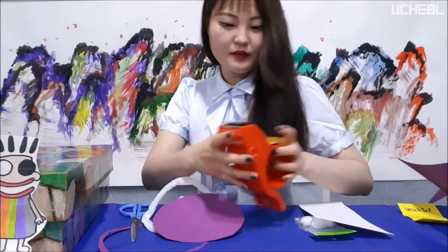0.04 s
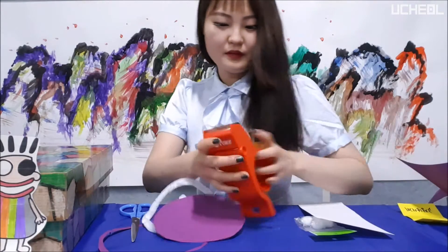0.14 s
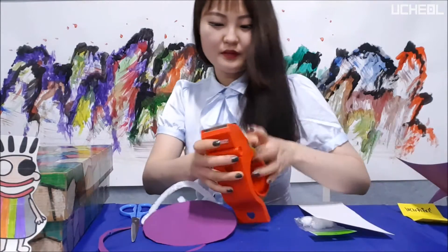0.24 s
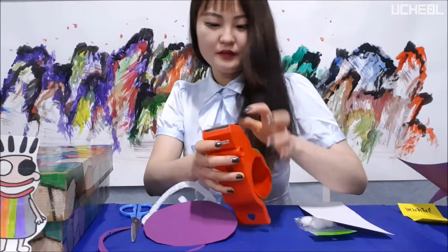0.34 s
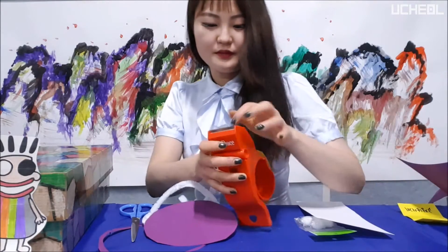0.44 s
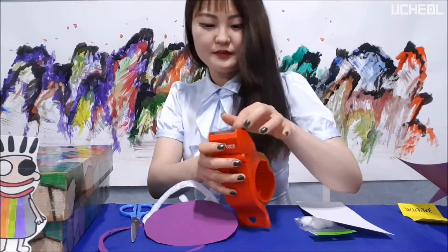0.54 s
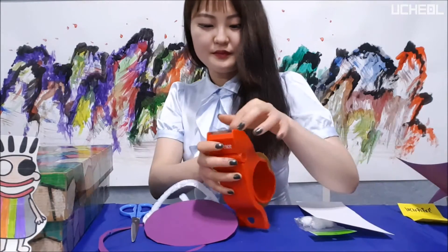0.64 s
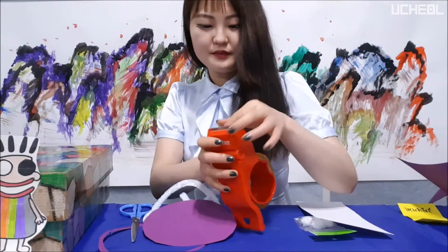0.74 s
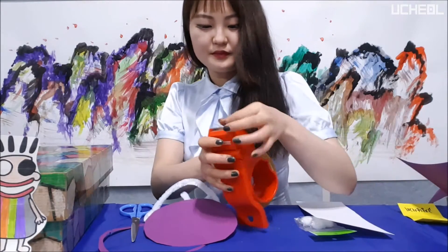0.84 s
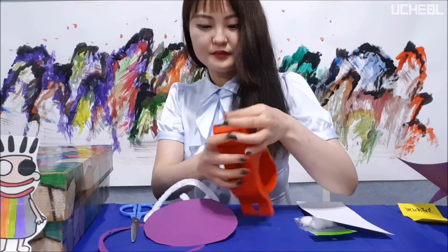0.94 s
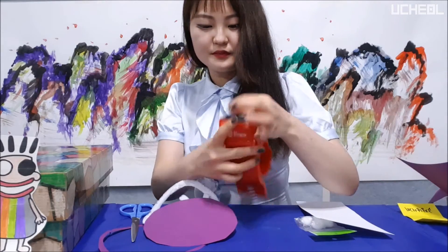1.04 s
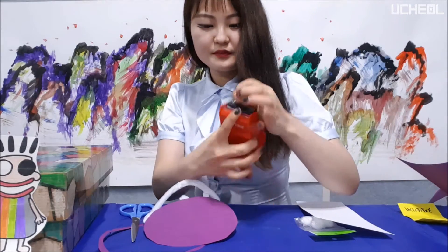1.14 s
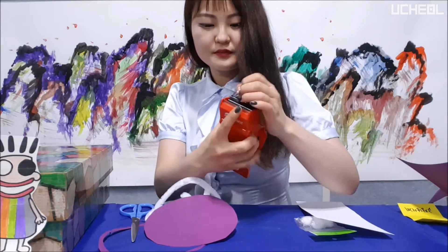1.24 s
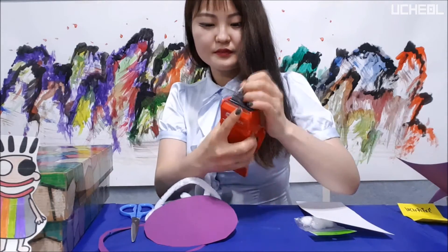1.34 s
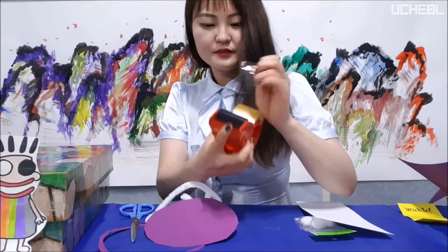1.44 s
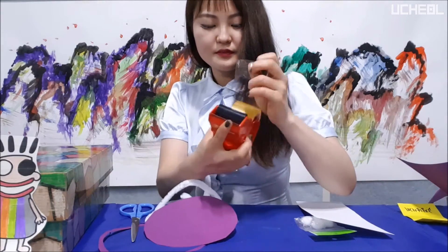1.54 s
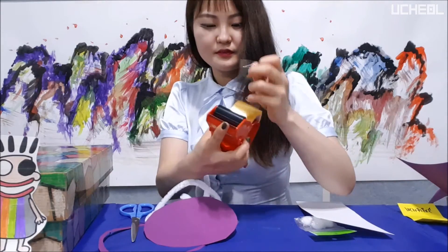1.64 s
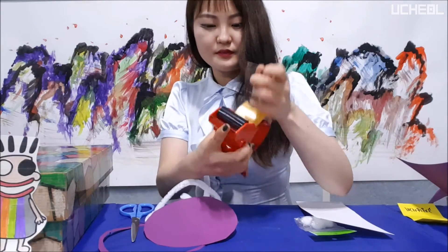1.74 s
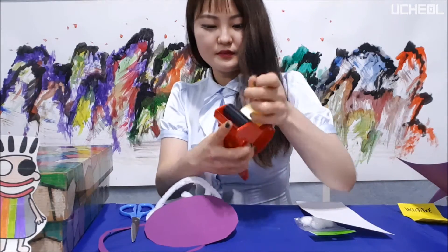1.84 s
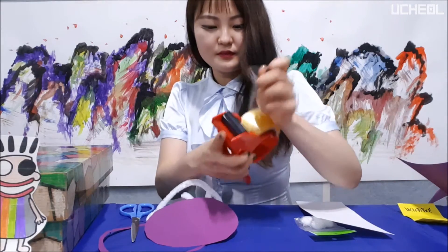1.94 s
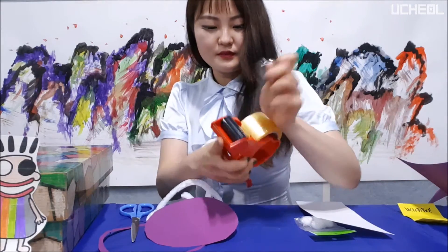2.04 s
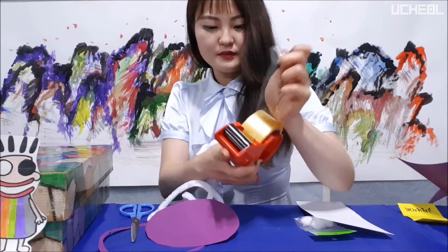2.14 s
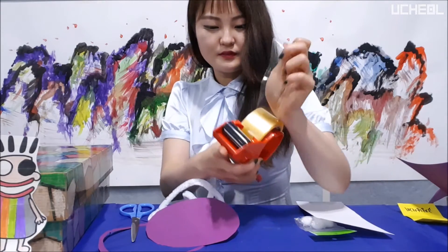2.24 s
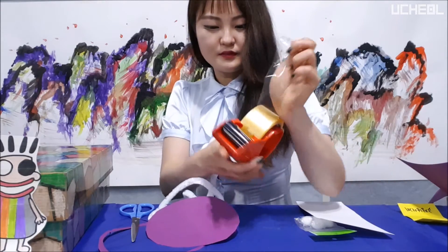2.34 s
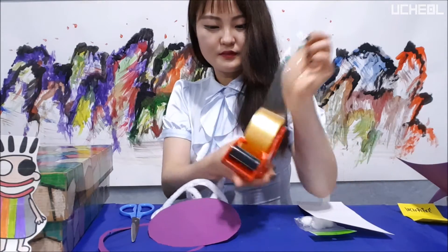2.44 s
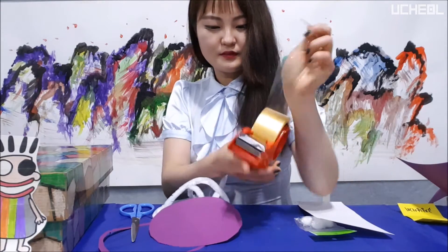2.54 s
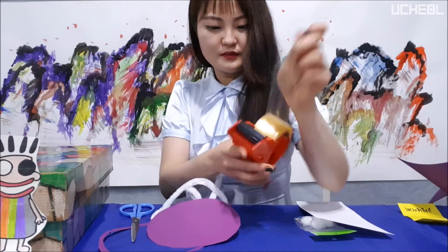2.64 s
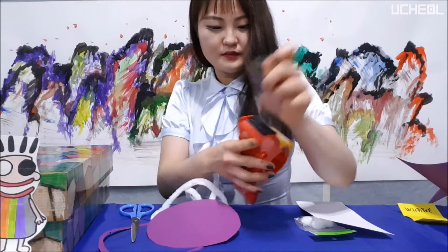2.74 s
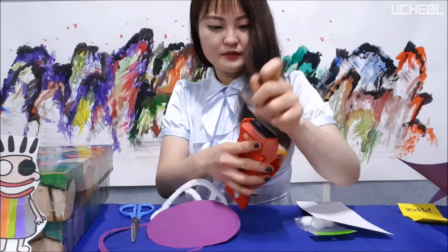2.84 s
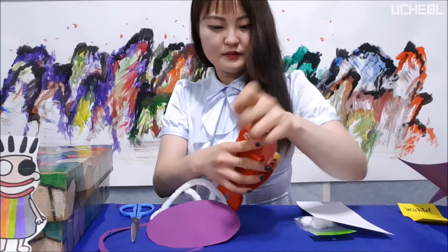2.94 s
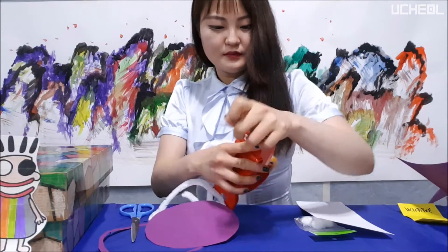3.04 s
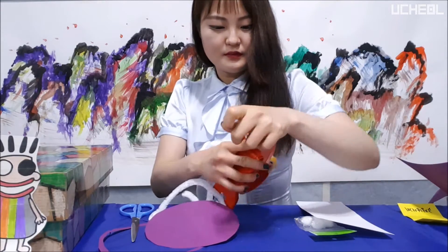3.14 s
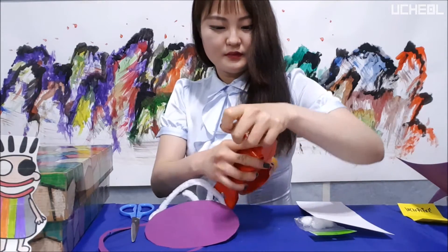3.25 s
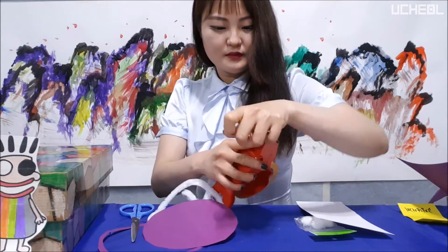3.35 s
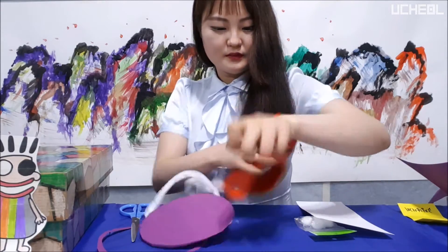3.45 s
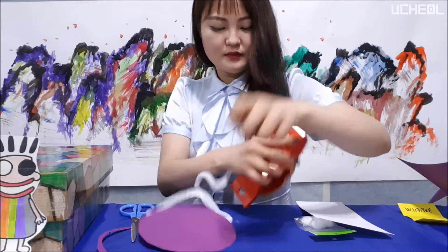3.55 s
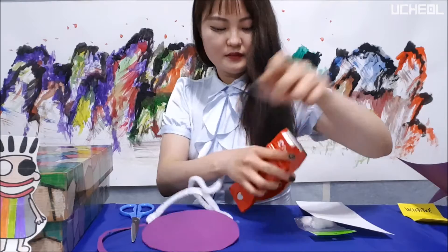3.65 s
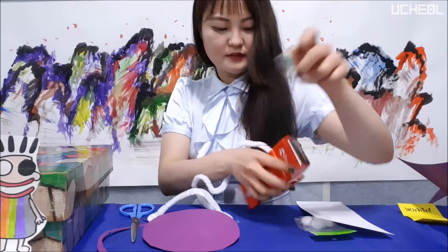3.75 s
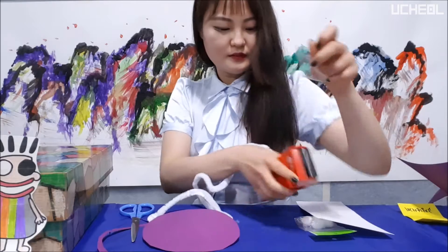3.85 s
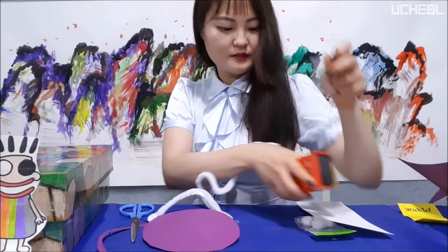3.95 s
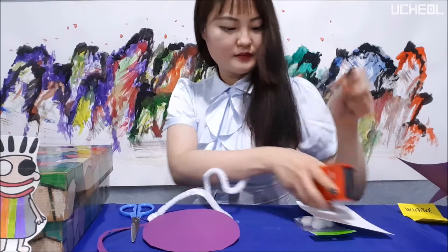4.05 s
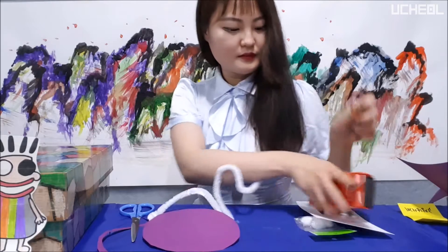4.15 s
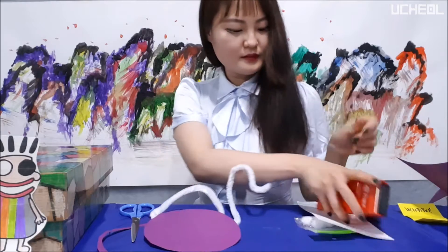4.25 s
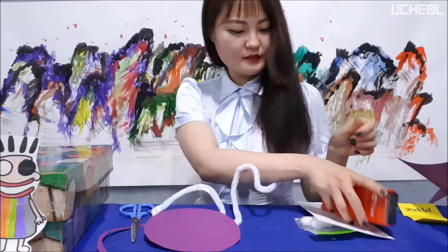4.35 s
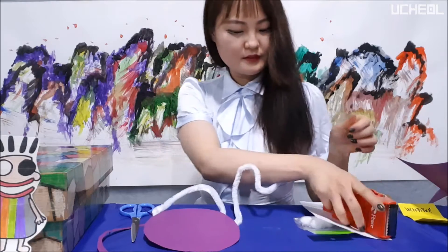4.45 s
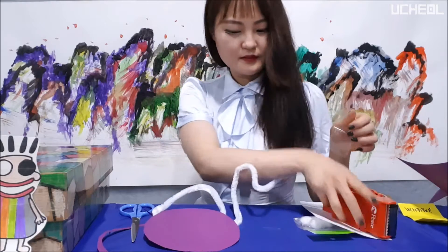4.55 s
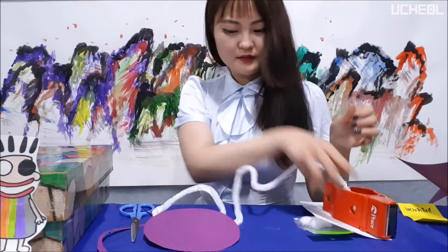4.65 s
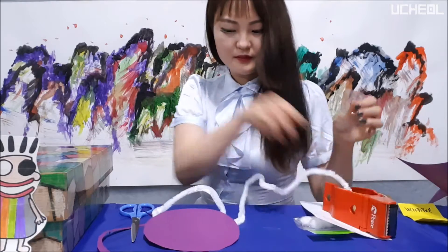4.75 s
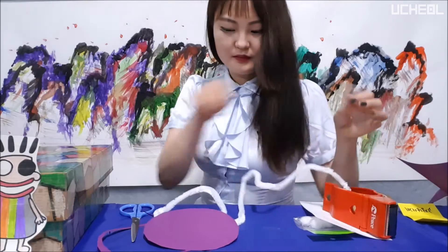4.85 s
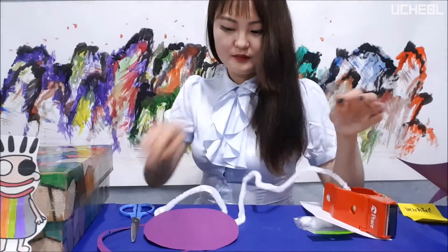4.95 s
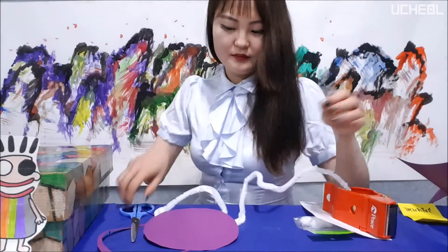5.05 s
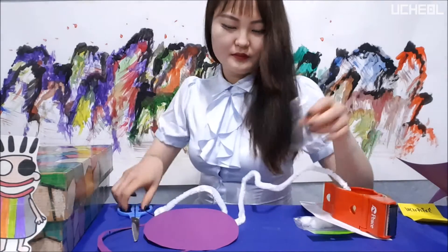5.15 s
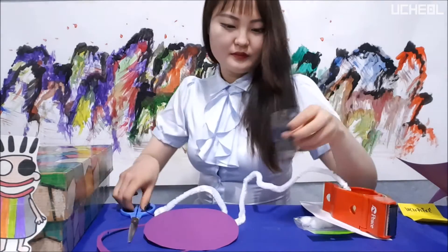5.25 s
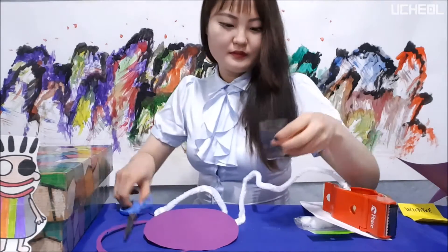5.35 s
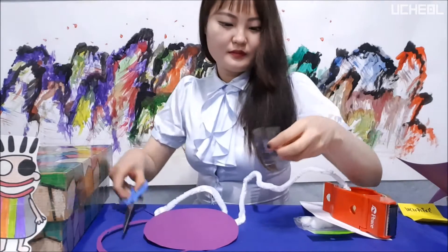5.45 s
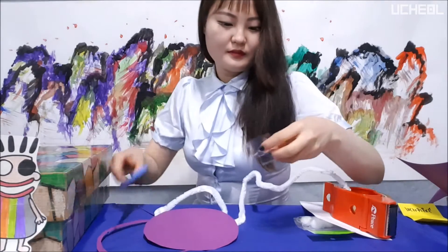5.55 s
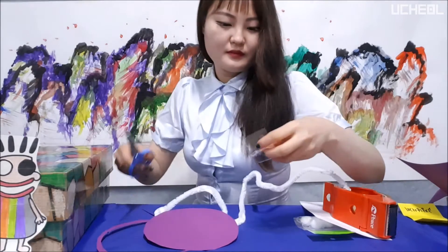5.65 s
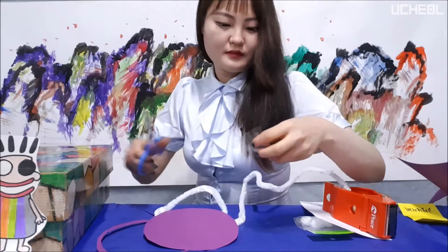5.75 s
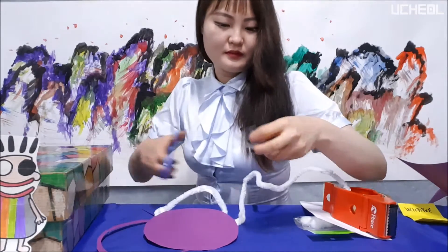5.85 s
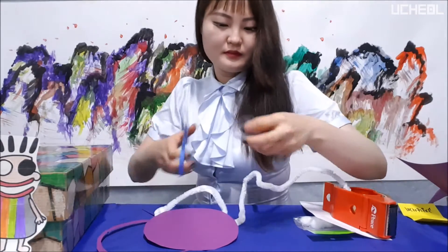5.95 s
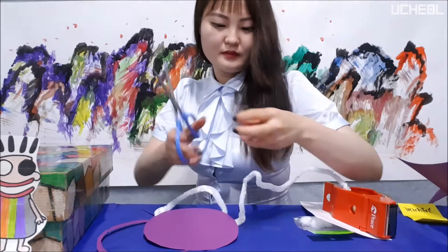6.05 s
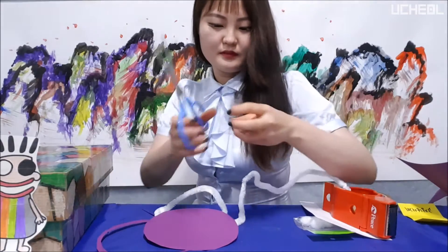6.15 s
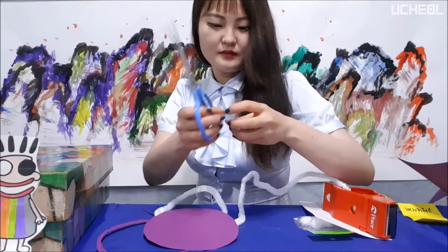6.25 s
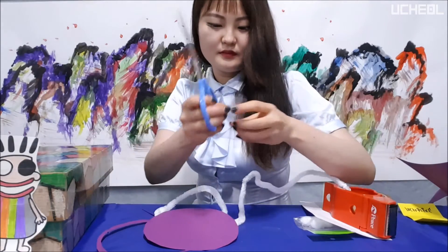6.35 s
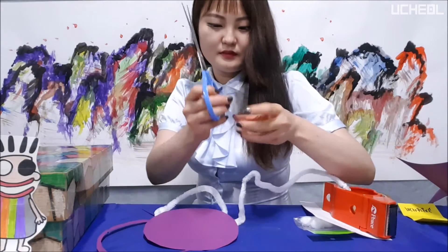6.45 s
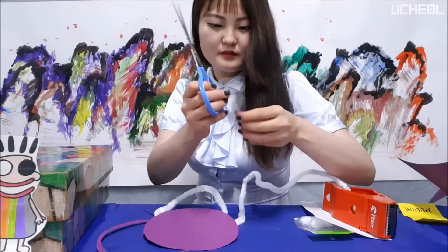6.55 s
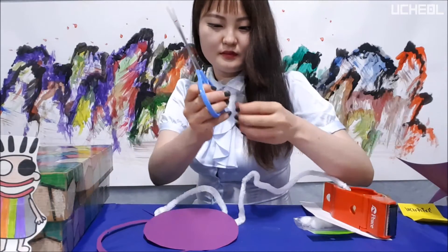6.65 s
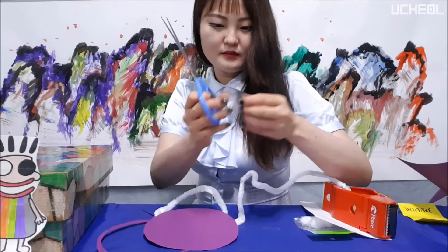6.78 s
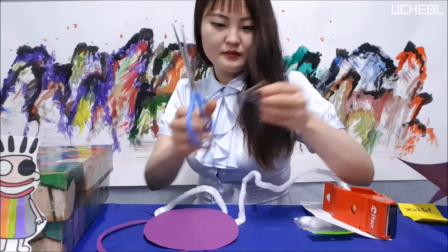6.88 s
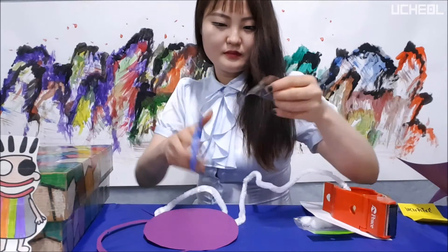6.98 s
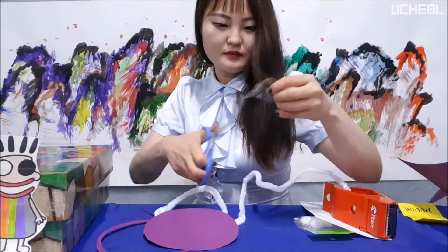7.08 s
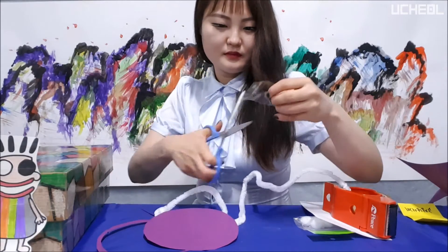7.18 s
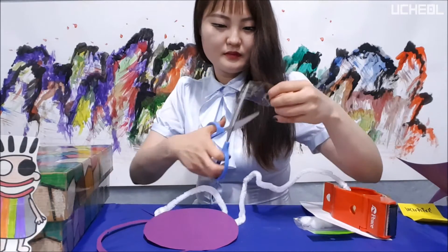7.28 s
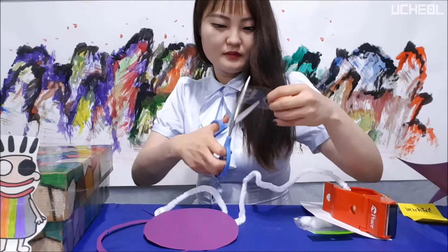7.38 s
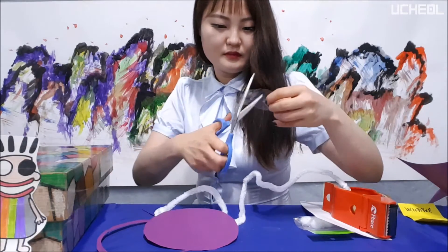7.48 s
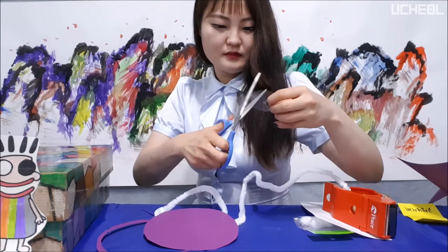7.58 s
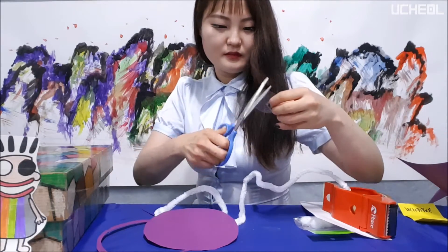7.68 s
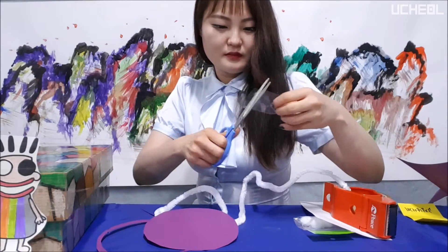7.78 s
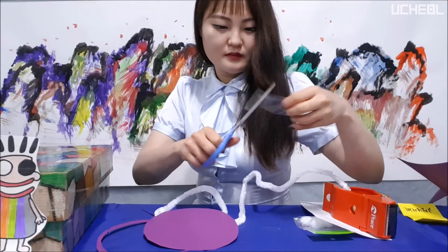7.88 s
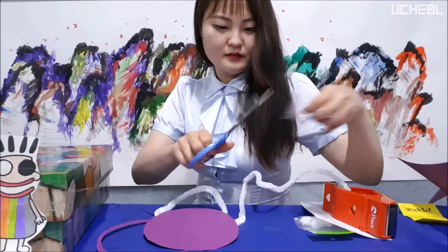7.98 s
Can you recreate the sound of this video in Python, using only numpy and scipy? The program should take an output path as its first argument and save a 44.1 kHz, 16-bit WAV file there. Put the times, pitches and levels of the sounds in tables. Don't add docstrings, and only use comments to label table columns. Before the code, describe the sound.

Small dry room, close stereo microphones, faint hush and low rumble. From 0 to 1 s, quiet handling: soft table bumps, nail ticks on hollow plastic. From 1.0 to 1.4 s film crackles and clicks get denser. At 1.5 s a short loud rip of sticky tape, hollow and plasticky, with rapid stick-slip snaps; brighter, sizzling rips follow at 2.05 and 2.2-2.3 s, then a tight, dense one at 2.5-2.6 s, the taut strip buzzing beneath. Near quiet until 3.5 s, when the blade tears the film in one short crunchy snap. At 4.4 s the dispenser thuds on the table, with a harder clack at 4.6 s. Light film crackle near 4.9 s. A small knock at 5.25 s as scissors are picked up, then fine metallic clicks at 6.4-6.6 and 6.9 s, and faint ticks from 7.8 s to the end at 8 s.

```python
import sys
import numpy as np
from scipy import signal
from scipy.fft import rfft, irfft, next_fast_len
from scipy.io import wavfile
from scipy.ndimage import uniform_filter1d, map_coordinates

SR = 44100
rng = np.random.default_rng(int(sys.argv[2]) if len(sys.argv) > 2 else 0)


def volts(x):
    e = np.asarray(x, float) / 20
    return 10 ** e


def transcribe(u):
    v = np.clip(np.atleast_2d(u).T, -1, 1)
    q = np.round(v * 32767).astype(np.int16)
    wavfile.write(sys.argv[1], SR, q)


N = 353593

# time in seconds, snap level in dB, centre of the crackle in Hz.
GLUE_RELEASES = [(1.4851, -17, 4400), (1.4908, -9, 4400), (1.5078, -7, 3700), (1.5093, -9, 4400),
                 (1.5137, -9, 8000), (1.515, -15, 4100), (1.5304, -9, 4500), (1.5333, -13, 3500),
                 (1.5354, -13, 3500), (1.5383, -20, 4400), (1.5439, -8, 6000), (1.5457, -17, 4300),
                 (1.5559, -24, 3500), (1.5602, -21, 4100), (2.0543, -12, 9000), (2.0587, -10, 8600),
                 (2.0623, -11, 8500), (2.0758, -11, 11000), (2.0784, -9, 8000), (2.0889, -8, 10600),
                 (2.0913, -9, 8600), (2.1027, -8, 10300), (2.1896, -5, 10900), (2.1976, -13, 6000),
                 (2.1994, -10, 10400), (2.2039, -8, 8300), (2.2128, -5, 11000), (2.2153, -11, 8200),
                 (2.2286, -9, 7500), (2.2397, -14, 8500), (2.2485, -16, 11000), (2.2499, -11, 8400),
                 (2.2722, -16, 8600), (2.2793, -13, 7600), (2.2897, -10, 8900), (2.2926, -9, 7400),
                 (2.2971, -12, 7500), (2.2988, -14, 10500), (2.3032, -16, 8000), (2.3191, -12, 7000),
                 (2.5163, -11, 6700), (2.5174, -12, 7200), (2.5339, -12, 8600), (2.5374, -11, 8300),
                 (2.5462, -8, 8300), (2.55, -10, 9500), (2.5585, -9, 7000), (2.5624, -9, 8700),
                 (2.5699, -11, 6600), (2.5727, -8, 9000), (2.5752, -11, 8000), (2.5816, -5, 8300),
                 (2.5834, -8, 7500), (2.5876, -8, 7500), (2.5946, -10, 9500), (2.5979, -10, 7200),
                 (2.6065, -10, 7800), (2.6094, -10, 8200), (2.6184, -9, 8600), (2.6211, -9, 8000)]
# start in seconds, hollow plastic tone in dB, crackle width relative to its
# centre, sharp click in dB.
PULLS = [
    (1.4, 4, 1.4, -1),
    (2.0, -2, 2.2, -1.5),
    (2.15, -8, 1.5, -1.5),
    (2.45, -4, .6, -3.5),
]
# time in seconds, ring level in dB, pitch in Hz.
TAUT_STRIP = [(1.484, -50, 1150), (1.509, -33, 896), (1.53, -22, 490), (1.565, -26, 570),
              (2.054, -26.5, 467), (2.102, -30, 460), (2.189, -29.5, 960), (2.25, -26.5, 977),
              (2.295, -20.5, 1002), (2.319, -26, 722), (2.516, -23, 973), (2.552, -27, 950),
              (2.573, -22.5, 572), (2.595, -29.5, 494), (2.62, -24, 493)]
# time in seconds, level in dB.
TEAR_LEVEL = [
    (3.519, -82),
    (3.522, -50),
    (3.527, -24),
    (3.533, -21.5),
    (3.545, -29),
    (3.562, -34),
    (3.59, -96.5),
]
# time in seconds, body in dB, bright part in dB re body.
FILM_BUCKLES = [(0.0247, -38.5, -1), (0.486, -37.5, 10.5), (1.0645, -31.5, 5.5), (1.1303, -25.5, -1),
                (1.1415, -35, 7), (1.1543, -34.5, 3), (1.205, -41, 12), (1.2366, -30, 6), (1.2765, -43, 12),
                (1.3328, -47, 6.5), (1.3592, -49, 7.5), (1.407, -24, -2), (1.911, -34, -4),
                (2.994, -51.5, 4), (4.712, -55, 7), (4.8422, -58, 9.5), (4.871, -52, 16.5),
                (4.9248, -35, 6), (4.9989, -49.5, 13), (5.6499, -47.5, 5), (7.106, -68.5, 19)]
# time in seconds, body in dB, pitch in Hz.
NAIL_CLICKS = [(0.3059, -46, 785), (.329, -30.5, 1900), (0.342, -33, 1830), (0.71, -47, 890),
               (0.8678, -54, 860), (0.9444, -29.5, 2660), (0.973, -36.5, 1144), (1.051, -27.5, 2600),
               (1.1806, -20.5, 2440), (1.712, -43, 2580), (1.7209, -38.5, 590), (1.724, -38.5, 1880),
               (1.9621, -31.5, 2140), (1.963, -40.5, 508), (2.9252, -38, 1860), (3.3417, -47.5, 1204),
               (3.4361, -48, 2580), (3.4665, -39, 3050), (3.5247, -20.5, 2800), (3.6621, -36.5, 2510),
               (4.267, -49.5, 3002)]
# time in
# seconds, body in dB, bright part in dB re body, pitch in Hz.
SMALL_TICKS = [(5.4004, -47, -15, 1110), (5.434, -50, -19, 2214), (5.7875, -48, -8.5, 1040),
               (6.1664, -39.5, -13, 2360), (6.4163, -43, -16, 3500), (6.4224, -48.5, -9.5, 980),
               (6.4454, -44, -13, 3400), (6.5329, -32.5, -13.5, 3600), (6.467, -38, -14, 3300),
               (6.517, -44, -20, 2260), (6.5547, -30, -9, 3800), (6.5904, -44, -3, 2530),
               (6.644, -43.5, -25, 2400), (6.855, -45, -15, 980), (6.885, -36, -26, 3150),
               (6.9, -26.5, -11, 1430), (6.9093, -34, 0, 1640), (6.9645, -29.5, -10.5, 3030),
               (7.279, -48, -26.5, 1975), (7.839, -42.5, -2, 2210), (7.8035, -44.5, -18, 1760),
               (7.882, -47.5, 4, 2080), (7.896, -47, 0, 1310), (7.927, -66, -8, 1740),
               (7.9903, -55, 10.5, 1500),
               (4.3883, -54, -2, 5800), (4.4935, -62, -6, 4500), (4.514, -50, -14, 5500), (4.5414, -60, 4, 3740),
          (4.575, -58, 8, 6000), (4.587, -47, -10, 5000), (4.5953, -30, -6, 3900), (4.638, -58, 3, 6000),
          (6.4295, -52, -12, 1000), (6.453, -50, -14, 3000), (6.479, -54, -10, 1000),
          (6.5043, -52, 4, 5200), (6.5124, -48, -3, 3750), (6.5235, -44, -6, 5200), (6.5598, -36, -8, 1000),
          (6.56, -34, -10, 3000), (7.77, -60, -12, 1500), (7.8603, -54, 8, 1200), (7.9195, -56, 8, 4200),
          (7.9795, -56, -4, 5500), (3.5208, -36, -20, 3000), (3.529, -16.5, -20, 2900),
          (3.535, -20, -20, 2750), (3.558, -24, -20, 1350), (1.3826, -60, 0, 2270), (3.698, -58, 6, 5000),
          (3.728, -53, -6, 2500), (3.787, -58, 4, 1500), (3.835, -60, 6, 6000)]
# time in seconds, body in dB,
# bright part in dB re body, pitch in Hz.
FINGER_TAPS = [(.045, -52.5, -10, 950), (.2, -55, -10, 3500), (0.399, -50.5, -4, 1410),
               (.645, -57.5, -11, 2530), (.868, -52.5, -20, 2200), (.976, -30, -20, 2570),
               (.979, -29, -19, 3900), (0.9817, -39.5, -15, 3300), (1.149, -41, 3.5, 2300),
               (1.209, -45, -6, 2300), (1.232, -53, -7, 770), (1.2811, -33, -5.5, 3220),
               (1.4167, -34, -4.5, 2000), (1.56, -13.5, -21, 2480), (1.5138, -12, -19, 1680),
               (2.925, -49, -23, 555), (2.997, -60, 2, 1100), (3.111, -61, -11.5, 1060),
               (3.217, -64, -13.5, 1056), (3.343, -43.5, -23, 2900), (4.889, -51, -2, 3580),
               (4.9225, -47, -4, 905), (4.946, -53, -12, 2700), (4.999, -57, -10, 1050),
               (5.26, -32, -20, 2660), (5.371, -46, -12, 1820), (5.353, -47, -9, 1240),
               (5.436, -39, -15, 1860), (5.433, -39, -8, 3480), (5.789, -49, -17, 2580),
               (6.645, -44.5, -13, 1400), (6.689, -52.5, -10, 1800), (6.711, -63, -6, 1500),
               (6.91, -41.5, -20.5, 586), (6.965, -46.5, -15, 600), (.713, -49.5, -20, 560),
               (4.397, -32.5, -30, 695), (4.399, -44, -30, 1076), (4.424, -37, -30, 530),
               (4.465, -44, -30, 563), (4.466, -49.5, -31.5, 1120), (4.5, -46.5, -29.5, 610),
               (4.54, -42, -21, 540), (4.545, -47.5, -19.5, 1880), (4.5959, -17, -30, 1100),
               (4.597, -24, -29.5, 653), (4.599, -24.5, -24.5, 1752), (5.257, -35, -25, 1086),
               (5.269, -33.5, -24, 1450), (6.557, -46.5, -20, 520), (6.5, -58, -18, 518),
               (7.92, -50, -21.5, 540)]
CONTACT_RING_DB = (-3, 1, -5, 1)
# start in seconds, length in seconds, level in dB, pitch in Hz,
# fizz in dB re level.
RUBS = [(1.476, 0.029, -42, 3600, 0), (1.5, .009, -41, 2100, 4), (1.128, .05, -54, 2300, 8),
        (1.42, .06, -66, 2000, 4), (4.51, .09, -70, 1800, 4), (4.4, .06, -68, 2500, -6),
        (1.495, 0.025, -38.5, 2500, 1.5), (1.34, 0.079, -63, 1800, 3.5), (4.594, 0.012, -44, 2500, -16),
        (0.084, 0.091, -66.5, 1100, 0), (0.302, 0.087, -55.5, 1650, -18), (4.62, 0.29, -76.5, 583, 2),
        (0.63, 0.012, -65, 780, -22), (1.2, 0.067, -58, 2600, 7.5), (1.15, 0.13, -63, 2400, 12),
        (1.08, 0.012, -73, 930, -13), (1.271, 0.018, -52, 3100, 6), (1.405, 0.04, -54, 2100, 8),
        (1.855, .025, -73, 1300, -30), (2.796, 0.11, -66.5, 1500, 3), (6.552, 0.017, -52, 590, 4.5),
        (3.65, 0.12, -66, 2500, 3), (5.243, 0.056, -51.5, 820, -36), (5.347, 0.063, -59.5, 950, -30),
        (5.432, 0.03, -55, 850, -15), (6.416, 0.22, -65, 1430, -20.5), (6.506, 0.04, -56, 1810, 3),
        (6.885, 0.037, -52.5, 790, 5.5), (6.959, 0.014, -48, 630, 9), (7.77, 0.29, -68, 1460, 2),
        (7.916, 0.04, -55, 1100, -6), (7.97, .06, -70, 3000, 4)]
# time in seconds, peak in dB, clack in dB re peak, main pitch in Hz.
TABLE_KNOCKS = [(0.122, -44.5, -19, 195), (0.479, -42.5, -20.5, 195), (3.835, -49.5, -8.5, 204),
                (4.229, -40.5, -14, 200.9), (4.3935, -17, -16, 275), (4.532, -30, -9.5, 227),
                (4.593, -15.5, -0.8, 314.5), (5.039, -42, -20, 216.6), (5.256, -26, -8, 281),
                (5.404, -39.5, -9, 217.6), (5.533, -49, -12, 213.7), (5.657, -54.5, -4, 199),
                (6.319, -48.5, -16, 224), (6.673, -45, -9.5, 201)]
# pitch in Hz, level in dB.
TABLE_RINGS = [(197, -1), (231, 0.5), (315, -5.5), (390, -10.5)]
# pitch in Hz, level in dB, time to fall 60 dB in seconds.
CLACK_RINGS = [(505, -3, .05), (575, -2, .045), (694, -6, .05), (870, 0, .04), (1100, 5, .045),
               (1480, -5, .03), (2050, -12, .025)]
# time in seconds, level in dB.
PANEL_BUMPS = [(.121, -57.5), (.474, -54.5), (4.235, -61), (5.036, -57.5), (6.674, -58)]
# start in seconds, length in seconds, level in dB, pitch in Hz.
TABLE_SHAKES = [(0.067, 0.19, -48, 110), (0.205, 0.26, -51.5, 116), (0.462, 0.17, -59.5, 198),
                (0.816, 0.065, -55, 113), (0.861, 0.097, -53.5, 64), (0.964, 0.18, -53, 91),
                (1.485, 0.045, -50, 111), (2.068, 0.031, -44.5, 71), (2.175, 0.11, -51, 93),
                (2.523, 0.1, -58.5, 80), (3.521, 0.17, -65, 152), (4.39, 0.26, -58, 134),
                (4.578, 0.2, -52.5, 111), (5.231, 0.25, -56.5, 133.5), (6.698, 0.74, -63, 98.9),
                (7.395, 0.44, -61.5, 102.6), (7.747, 0.48, -62, 100.3)]
# time in seconds, level in dB.
FLOOR_LEVEL = [(0, -68.5), (1.5, -65.5), (3.2, -87.5), (4.2, -66), (6.3, -75.5), (8.03, -76)]
# centre in Hz, width in Hz, level in dB.
SHELL_MODES = [(228, 150, -22), (493, 68, 1), (617, 46, 3), (950, 350, 2), (1500, 3900, -4.5),
               (2400, 290, -8)]
# frequency in Hz, level in dB.
SNAP_COLOUR = [(820, -23.5), (1400, -9.5), (2300, -9), (4300, -6.5), (6800, -4.5), (11300, -6), (14900, -6),
               (16500, -28)]
HOLLOW_COLOUR = [(700, -37), (1400, 0), (2400, 0), (4200, 3), (7000, -29)]
TEAR_COLOUR = [(150, -38), (400, -17), (1300, -7), (2000, -7.5), (2900, -1.5), (4500, -6), (6600, -15),
               (8000, -9), (15000, -12), (16500, -30)]
FIZZ_COLOUR = [(2500, -12), (5000, 0.5), (8000, -8), (14000, -6.5), (16500, -14.5)]
THUD_COLOUR = [(60, -36), (130, -4.5), (280, -7), (600, 5), (1200, -14), (3500, -18.5), (8000, -39)]
RUMBLE_COLOUR = [(14, -47), (24, -14.5), (45, -5), (102, 1), (171, -9), (190, 0), (250, -30), (420, -120)]
HUSH_COLOUR = [(20, -15), (62, -11), (160, -20.5), (225, -12), (400, -20.5), (2500, -30.5), (8000, -42),
               (16000, -36)]
# frequency in Hz, likeness from 0 to 1.
LIKENESS = [(60, 0.083), (300, 0.52), (700, 0.083), (3000, 0.21), (15000, .02)]
# frequency in Hz, time to fall 60 dB in seconds.
ROOM_DECAY = [(200, 0.21), (500, .14), (1000, 0.17), (4000, 0.15), (12000, 0.13)]
# frequency in Hz, level in dB.
LEFT_FAVOUR = [(100, .3), (1000, .6), (3000, 0), (8000, 2), (14000, 1.8)]

PITCH_SCATTER = 0.09
FILM_HZ, FILM_SCATTER = 2550, 0.05
NAIL_BRIGHT_DB = -11
TOP_RING_DB, TOP_T60_S = -13, 0.19
CLACK_DAMPS_S = 0.018
PANEL_HZ, PANEL_T60_S = 695, 0.2
HUSH_DB, HUSH_FOLLOWS = -68.5, 0.2
LAG_S = 0.000093
TOP_HZ = 16300


def unit(x):
    return x / np.sqrt(np.mean(x ** 2) + 1e-20)


def along(points, hz):
    f, v = np.transpose(points)
    return np.interp(np.log(hz + 1), np.log(f + 1), v)


def level_curve(rows):
    s, db = np.transpose(rows)
    return np.interp(np.arange(N) / SR, s, db, -120, -120)


def filtered(x, response):
    m = next_fast_len(N + SR // 2)
    return irfft(rfft(x, m) * response(np.fft.rfftfreq(m, 1 / SR)), m)[..., :N]


def coloured(x, spectrum):
    return filtered(x, lambda hz: unit(volts(along(spectrum, hz))))


def around(rows, hz, width):
    f = np.fft.rfftfreq(rows.shape[1], 1 / SR)
    c = np.reshape(hz, (-1, 1))
    band = 1j * f * width * c / (c * c - f * f + 1j * f * width * c)
    power = np.mean(np.abs(band) ** 2, 1, keepdims=True)
    return irfft(rfft(rows) * band / np.sqrt(power), rows.shape[1])


def wobble(rate):
    knots = rng.standard_normal(int(N * rate / SR) + 4)
    return map_coordinates(knots, [np.arange(N) * rate / SR])


def grit(spread_db, size):
    luck = rng.random((*size, 2))
    grains = (2 * luck[..., 0] - 1) * volts(-spread_db * np.log(luck[..., 1] + 0.032))
    return grains / np.sqrt(np.mean(grains ** 2, -1, keepdims=True))


def place(times, sounds):
    start = np.round(np.asarray(times) * SR).astype(int)
    index = start[:, None] + np.arange(sounds.shape[1])
    return np.bincount(index.ravel(), sounds.ravel(), N + SR)[:N]


def rings(hz, db, t60, attack, size):
    t = np.arange(size) / SR
    col = lambda v: np.reshape(v, (-1, 1))
    envelope = volts(col(db) - 60 * t / col(t60)) * (1 - np.exp(-t / col(attack)))
    return envelope * np.sin(2 * np.pi * col(hz) * t)


def bursts(db, t60, spread_db, size, attack=0.00019, spike=0):
    t = np.arange(size) / SR
    grains = grit(spread_db, (len(db), size)) * volts(-60 * t / t60) * (1 - np.exp(-t / attack))
    grains[:, 8] += spike * np.sign(grains[:, 8])
    return grains * volts(np.reshape(db, (-1, 1)))


def swells(db, length, size):
    u = np.clip(np.arange(size) / SR / np.reshape(length, (-1, 1)), 0, 1)
    return volts(np.reshape(db, (-1, 1))) * np.sin(np.pi * u ** 0.55)


def both(common, left, right, share):
    share = np.clip(share, 0, 1)
    return np.sqrt(1 - share) * common + np.sqrt(share) * np.array([left, right])


def releases():
    s, db, crackle_hz = np.transpose(GLUE_RELEASES)
    at, ring_db, hz = np.transpose(TAUT_STRIP)
    scatter = 1 + PITCH_SCATTER * rng.standard_normal(len(s))
    return s, db, crackle_hz, np.interp(s, at, ring_db) - db, np.interp(s, at, hz) * scatter


def shell(hz):
    total = 0
    for k, (c, width, db) in enumerate(SHELL_MODES):
        total = total + (-1) ** k * volts(db) * 1j * hz * width / (c * c - hz * hz + 1j * hz * width)
    return total


def peel():
    s, db, crackle_hz, ring_db, hz = releases()
    start, tone_db, width, click_db = np.transpose(PULLS)
    pull = np.searchsorted(start, s) - 1
    sprays = []
    for _ in range(3):
        crack = bursts(db - 2.5, 0.0062, spread_db=5.0, size=1800, attack=0.0003)
        threads = bursts(db - 18.5, 0.02, spread_db=6, size=1800)
        sprays.append(place(s - 0.0005, around(crack + threads, crackle_hz, width[pull, None])))
    click = place(s - 0.0003, bursts(db + click_db[pull], 0.0004, spread_db=2.5, size=60, spike=1.6))
    snaps = both(*sprays, share=0.73) + click
    tone = place(s, bursts(db - 10.5 + tone_db[pull], 0.018, spread_db=5, size=1500))
    strip = place(s, rings(hz, db + ring_db + 4.0, 0.028, 0.0014, size=3000))
    jolt = place(s, bursts(db + ring_db + 14.5, 0.023, spread_db=6.5, size=1200))
    return coloured(snaps, SNAP_COLOUR) + coloured(tone, HOLLOW_COLOUR) + strip + filtered(jolt, shell)


def tear():
    at = round(TEAR_LEVEL[0][0] * SR)
    spray = np.pad(both(*grit(4, (3, 4000)), share=0.25), ((0, 0), (at, N - at - 4000)))
    level = volts(level_curve(TEAR_LEVEL) + 0.75 * wobble(360))
    return coloured(level * spray, TEAR_COLOUR)


def contacts():
    film = [(*row, FILM_HZ * (1 + FILM_SCATTER * rng.normal())) for row in FILM_BUCKLES]
    nails = [(s, db, NAIL_BRIGHT_DB, hz) for s, db, hz in NAIL_CLICKS]
    kinds = (film, nails, SMALL_TICKS, FINGER_TAPS)
    return np.transpose([(*row, ring_db) for rows, ring_db in zip(kinds, CONTACT_RING_DB) for row in rows])


def ticks():
    s, db, bright_db, hz, ring_db = contacts()
    soft_db = 0.4 * np.minimum(bright_db + 18, 0)
    body = rings(hz, db + ring_db, (110 / hz) ** 2 + 0.006, 0.3 / hz, size=1500)
    u = 1j * np.fft.rfftfreq(1500, 1 / SR) / hz[:, None]
    band = (u / (u + 0.35)) ** 2 / (1 + u / 1.6 + (u / 1.6) ** 2) / (1 + u / 3)
    band = band * np.sqrt(8000 / hz[:, None])
    grains = bursts(db - 1 + soft_db, 0.009, spread_db=4, size=1500, attack=0.0003, spike=2.2)
    puff = irfft(rfft(grains) * band, 1500)
    spark = lambda: bursts(db + bright_db + 2.5, 0.007, spread_db=6, size=600, attack=0.0003, spike=0.2)
    sparks = both(*[place(s, spark()) for _ in range(3)], share=0.35)
    return place(s, body + puff) + coloured(sparks, FIZZ_COLOUR)


def hands():
    s, length, db, hz, fizz_db = np.transpose(RUBS)
    size = 13000
    rub = lambda: around(around(grit(8, (len(s), size)), hz, width=1.6), hz, width=2.5) * 1.6
    scrape = [place(s, swells(db, length, size) * rub()) for _ in range(2)]
    fizz = [place(s, swells(db + fizz_db, length, size) * grit(7, (len(s), size))) for _ in range(2)]
    clumps = volts(5 * np.tanh(wobble(130)) + 5 * np.tanh(1.3 * wobble(500)) - 6)
    wide_scrape = both(scrape[0], scrape[1], -scrape[1], share=0.81)
    wide_fizz = both(fizz[0], fizz[1], -fizz[1], share=0.43)
    return clumps * (wide_scrape + coloured(wide_fizz, FIZZ_COLOUR))


def knocks():
    s, db, clack_db, hz = np.transpose(TABLE_KNOCKS)
    top_t60 = TOP_T60_S - CLACK_DAMPS_S * clack_db
    note = place(s, rings(hz, db - 4.0, 0.13, 0.002, size=5000))
    modes = [(c, level, TOP_RING_DB, top_t60) for c, level in TABLE_RINGS]
    modes += [(c, level, clack_db - 4.5, t60) for c, level, t60 in CLACK_RINGS]
    ringing = 0
    for c, level_db, blow_db, t60 in modes:
        pitch_luck, level_luck = rng.normal(0, 1, (2, len(s)))
        mode_db = db + blow_db + level_db + 1.5 * level_luck
        ringing = ringing + place(s, rings(c * (1 + 0.03 * pitch_luck), mode_db, t60, 0.002, size=13000))
    rattle = 1 + 0.65 * np.tanh(wobble(60))
    thud = place(s, bursts(db + clack_db - 4.0, 0.13, spread_db=3.5, size=12000, attack=0.00085))
    return note + ringing * rattle + coloured(thud, THUD_COLOUR)


def panel():
    s, db = np.transpose(PANEL_BUMPS)
    return place(s, rings(PANEL_HZ, db, PANEL_T60_S, 0.0039, size=8000))


def room(x):
    turn = (np.arange(N) // 1500) % 3
    hz, t, z = signal.stft(rng.standard_normal((3, 2, SR // 4)), SR, nperseg=256)
    decay = volts(-60 * t / along(ROOM_DECAY, hz)[:, None])
    tails = signal.istft(z * decay, SR, nperseg=256)[1]
    wet = 0
    for k, tail in enumerate(tails):
        fade = uniform_filter1d(1.0 * (turn == k), size=300)
        wet = wet + signal.oaconvolve(x * fade, tail / np.linalg.norm(tail[0]), axes=1)
    return np.pad(wet, ((0, 0), (130, 0)))[:, :N]


def stereo_noise(spectrum):
    turn = lambda hz: np.arccos(np.clip(along(LIKENESS, hz), -1, 1)) / 2
    response = lambda hz: volts(along(spectrum, hz)) * [np.cos(turn(hz)), np.sin(turn(hz))]
    mid, side = filtered(rng.standard_normal((2, N)), response)
    return unit(np.array([mid + side, mid - side]))


def background():
    s, length, db, hz = np.transpose(TABLE_SHAKES)
    noise = rng.standard_normal((len(s), 24000))
    low = around(around(noise, hz, width=0.91), hz, width=0.91)
    shake = place(s, swells(db, length, size=24000) * low / low.std(1, keepdims=True))
    floor_db = level_curve(FLOOR_LEVEL)
    rumble = volts(floor_db + 1.2 * wobble(6)) * stereo_noise(RUMBLE_COLOUR)
    hush_db = HUSH_DB + HUSH_FOLLOWS * (floor_db - HUSH_DB) + 4.0
    hush = volts(hush_db) * stereo_noise(HUSH_COLOUR)
    return hush + rumble + shake * volts([[0.6], [-0.6]])


def scene():
    tape = peel() + tear()
    small = ticks() + hands()
    table = knocks() + panel()
    side = np.array([[1], [-1]])
    lean = lambda hz: volts(side * along(LEFT_FAVOUR, hz)) * np.exp(1j * np.pi * hz * side * LAG_S)
    direct = filtered(tape + small + table, lean)
    echoes = room(volts(-6.5) * tape + volts(-9.5) * small + volts(-11.0) * table)
    return direct + echoes + background()


def top_cut(x):
    return signal.sosfilt(signal.butter(12, 17150, fs=SR, output="sos"), x)


def record(dry):
    bent = dry / (1 + np.abs(dry / 0.85) ** 6) ** (1 / 6)
    mix = filtered(bent, lambda hz: 1 / (1 + (hz / TOP_HZ) ** 60))
    return top_cut(mix)


dry = scene()
out = record(dry)
transcribe(out)
```